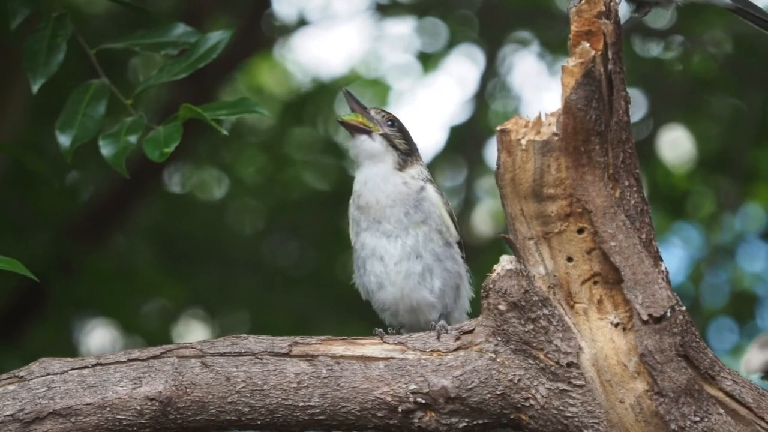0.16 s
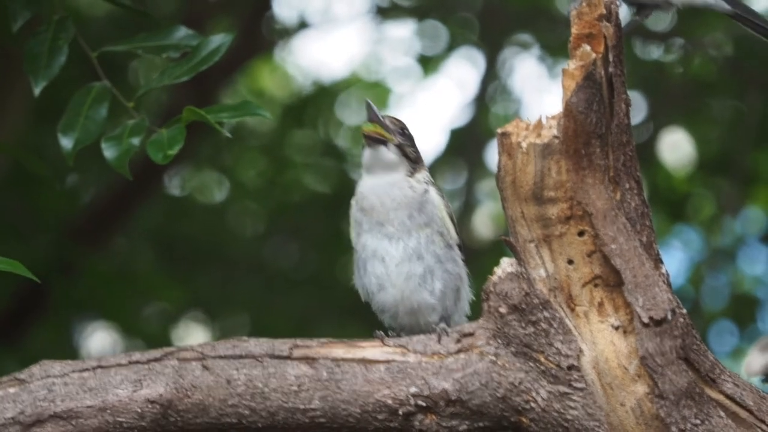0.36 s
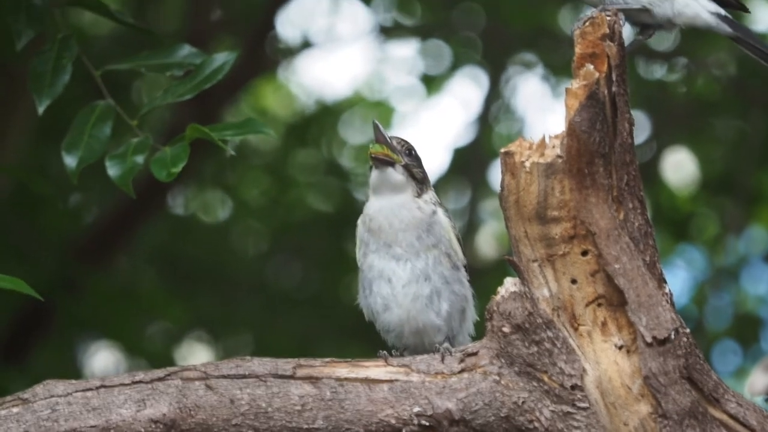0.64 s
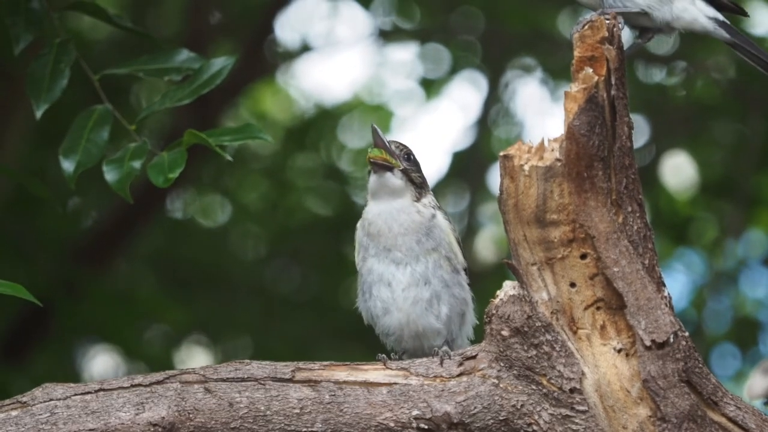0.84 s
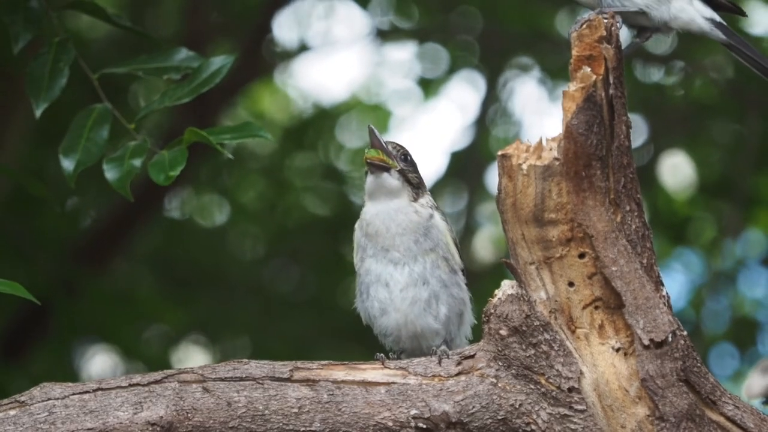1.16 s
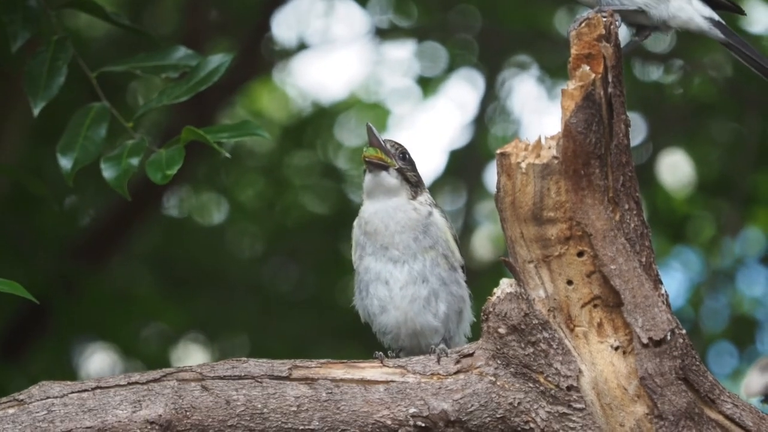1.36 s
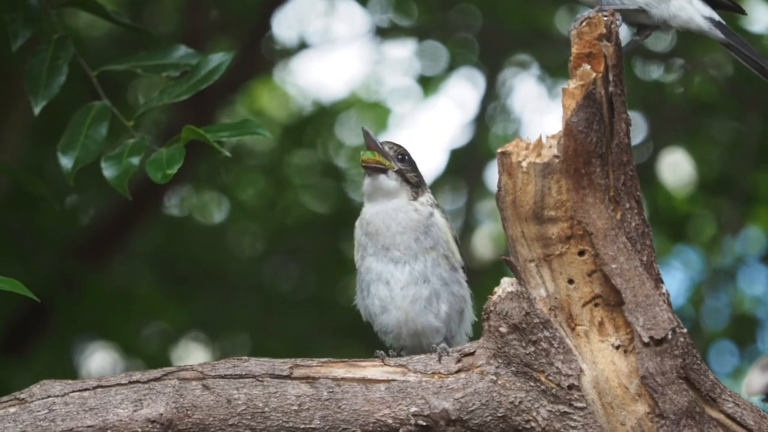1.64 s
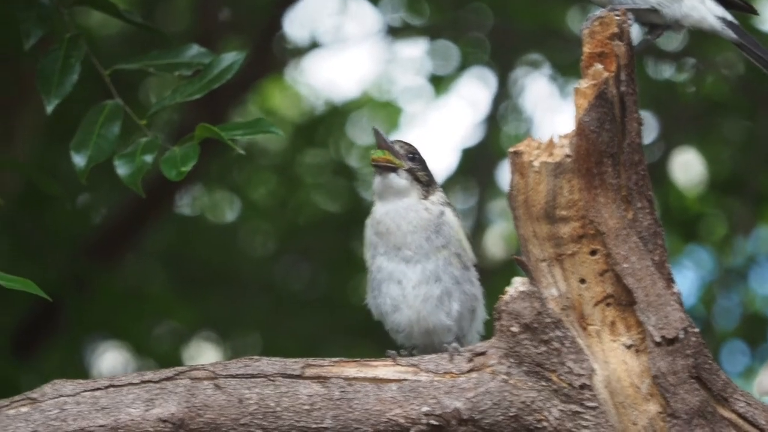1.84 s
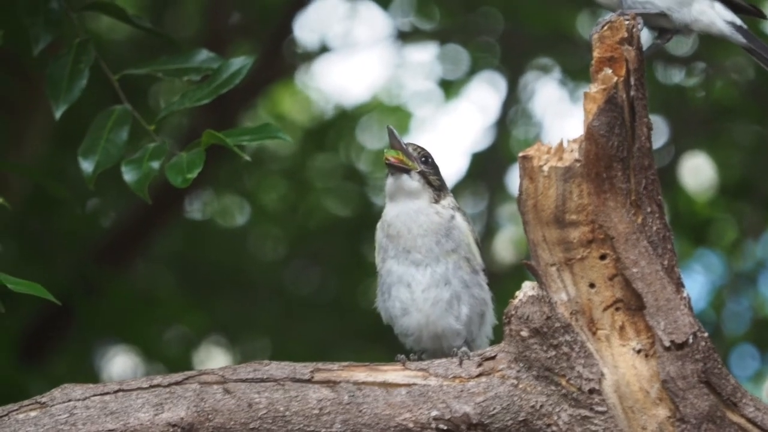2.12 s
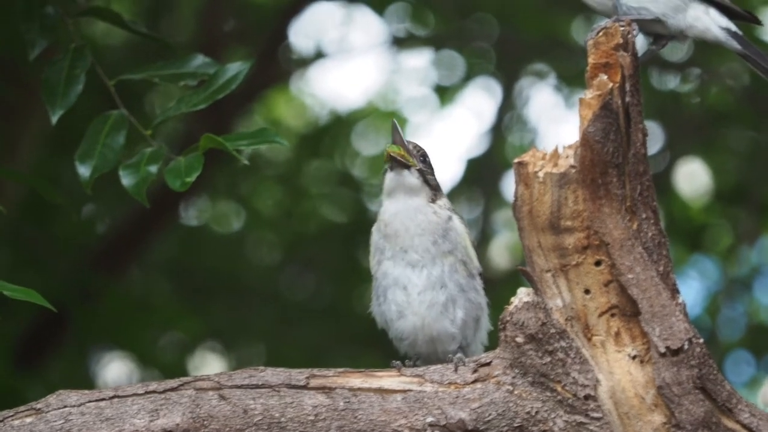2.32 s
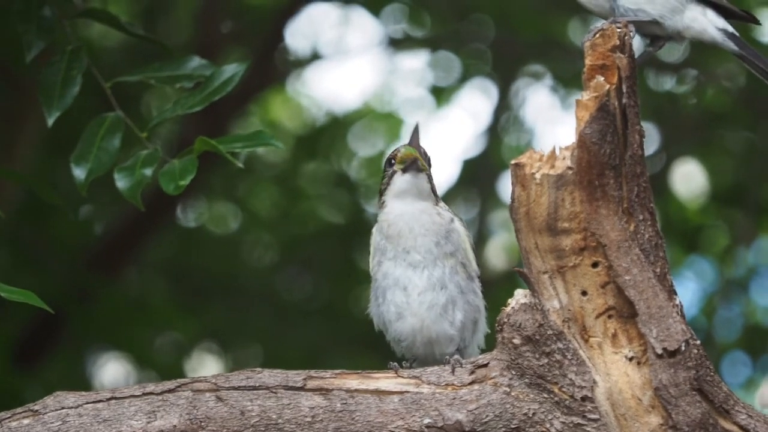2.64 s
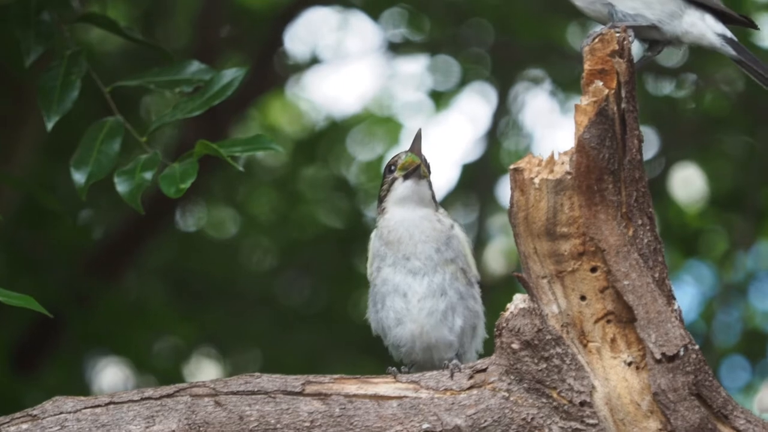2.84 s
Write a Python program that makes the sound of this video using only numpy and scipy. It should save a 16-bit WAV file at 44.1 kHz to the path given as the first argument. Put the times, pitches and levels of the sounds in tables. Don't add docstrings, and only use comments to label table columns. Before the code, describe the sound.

Rising, raspy begging squawks from a young bird close by, with fluttering wings and claw knocks on wood

```python
import sys
import numpy as np
from scipy import signal
from scipy.fft import rfft, irfft
from scipy.io import wavfile

SR = 44100
rng = np.random.default_rng(int(sys.argv[2]) if len(sys.argv) > 2 else 0)


def ratio_of_db(decibels):
    return 10 ** (np.asarray(decibels, float) / 20)


def store_wav(level_fs):
    pcm = np.round(np.clip(np.atleast_2d(level_fs), -1, 1) * 32767)
    wavfile.write(sys.argv[1], SR, pcm.T.astype(np.int16))


N = 131418
TIME = np.arange(N) / SR
SIDES = np.array([[1], [-1]])


def rms_one(x):
    return x / np.sqrt(np.mean(x ** 2) + 1e-20)


def at_hz(points, hz):
    points_hz, values = np.transpose(points)
    return np.interp(np.log(hz), np.log(points_hz), values)


def drift(rate):
    r = np.exp(-40 * np.pi * rate / SR)
    noise = rng.standard_normal(N // 20 + 2002)
    slow = rms_one(signal.lfilter([1], [1, -2 * r, r * r], noise)[2000:])
    return np.interp(np.arange(N) / 20, np.arange(len(slow)), slow)


def resonance(x, hz, width_hz):
    r = np.exp(-np.pi * width_hz / SR)
    poles = [1, -2 * r * np.cos(2 * np.pi * hz / SR), r * r]
    return signal.lfilter(np.array([1, 0, -1]) * (1 - r * r) / 2, poles, x)


def filtered(x, order, hz, kind):
    return signal.sosfilt(signal.butter(order, hz, kind, fs=SR, output="sos"), x)


# (frequency [Hz], left-right likeness [0-1])
FIELD_LIKENESS = [(60, 1), (180, 0.85), (550, 0.68), (1650, 0.57), (4970, 0.15), (15000, 0.45)]
# (frequency [Hz], left minus right [dB])
FIELD_BALANCE = [(60, 2), (240, 1), (950, 0.5), (3770, 1), (15000, 1.5)]


def stereo_noise(spectrum, alike_share):
    hz = np.maximum(np.arange(N // 2 + 1) * SR / N, 1)
    low_cut = np.minimum(hz / spectrum[0][0], 1) ** 2
    mid, side = rfft(rng.standard_normal((2, N)))
    alike = np.clip((at_hz(FIELD_LIKENESS, hz) - .3) / .7, 0, 1) ** .5 * alike_share
    tilt = ratio_of_db(at_hz(FIELD_BALANCE, hz) / 2 * SIDES)
    both = np.sqrt(1 + alike) * mid + np.sqrt(1 - alike) * side * SIDES
    return rms_one(irfft(both * tilt * low_cut * ratio_of_db(at_hz(spectrum, hz)), N))


# (frequency [Hz], density [dB per Hz])
LEAF_TRAFFIC_SPECTRUM = [(100, 3), (620, -2), (820, -8.5), (1200, -6), (3000, -10.5), (4500, -20),
                         (7000, -24), (16000, -34)]


def leaves_and_traffic():
    return ratio_of_db(-58 + 1.03 * drift(18)) * stereo_noise(LEAF_TRAFFIC_SPECTRUM, alike_share=0.87)


# (frequency [Hz], density [dB per Hz])
RUMBLE_SPECTRUM = [(15, 12.5), (25, 9), (45, 2), (70, -7.5), (110, -21.5), (160, -42)]
# (time [s], level [dB])
WIND_LEVEL = [(0, -42), (.55, -45), (.75, -43.5), (1.6, -42), (2.05, -43.5), (2.4, -41), (2.98, -44.5)]


def wind():
    gust = ratio_of_db(np.interp(TIME, *np.transpose(WIND_LEVEL)))
    return gust * ratio_of_db(1.1 * drift(5.3)) * stereo_noise(RUMBLE_SPECTRUM, alike_share=.995)


# (time [s], level [dB])
ENGINE_LEVEL = [(0, -65.5), (0.498, -67), (.7, -74), (2.1, -105), (2.17, -64), (2.4, -58), (2.66, -57.5),
                (2.88, -62), (2.98, -75)]
ENGINE_HZ, ENGINE_WIDTH_HZ = 357.6, 153


def engine():
    noise = rng.standard_normal(N)
    for _ in range(2):
        noise = resonance(noise, ENGINE_HZ, ENGINE_WIDTH_HZ)
    tone_hz = ENGINE_HZ * (1 + .08 * drift(8.4))
    tone = np.sin(2 * np.pi * np.cumsum(tone_hz) / SR)
    level = ratio_of_db(np.interp(TIME, *np.transpose(ENGINE_LEVEL)))
    return level * (rms_one(noise) + ratio_of_db(-6) * tone)


# (frequency [Hz], gain [dB])
THROAT_RESPONSE = [(1250, 1), (2000, -12), (2500, -1), (3150, -9), (3800, -9), (4500, -21), (5400, -11),
                   (7500, -16)]
ATTACK_S, RELEASE_S = 0.012, 0.0067
WOBBLE, DROOP_SHARE, DROOP_S = .006, 0.054, 0.0397
FADE_DB, FADE_RATE_HZ, RASP = 1.6, 40, .25


def voice(calls):
    s, hz, db, open_db = np.transpose([row for call in calls for row in call])
    droop, gate = np.zeros(N), np.zeros(N)
    for call in calls:
        start, end = call[0][0], call[-1][0]
        droop += np.clip((TIME - end) / DROOP_S + .5, 0, 1) * (TIME < end + .05)
        attack = np.clip((TIME - start) / ATTACK_S + .5, 0, 1)
        gate += attack * np.clip((end - TIME) / RELEASE_S + 1, 0, 1)
    pitch = np.interp(TIME, s, hz) * (1 + WOBBLE * drift(73.5) - DROOP_SHARE * droop ** 2)
    phase = 2 * np.pi * np.cumsum(pitch) / SR
    opening = np.interp(TIME, s, open_db)
    out = np.zeros(N)
    for k in range(1, 7):
        gain_db = at_hz(THROAT_RESPONSE, k * pitch) + FADE_DB * np.sqrt(k) * drift(FADE_RATE_HZ)
        if k > 1:
            gain_db = gain_db + opening
        if k > 4:
            gain_db = gain_db - 11
        rasp = 1 + RASP * np.sqrt(k) * drift(100)
        out += ratio_of_db(gain_db) * rasp * np.sin(k * phase)
    return np.sqrt(2) * out * gate * ratio_of_db(np.interp(TIME, s, db))


# (delay [s], left level [dB], right level [dB])
TRUNK_ECHOES = [(.019, -14, -15), (.041, -15, -14), (.075, -15, -16)]
LEAVES_T60_S, LEAVES_DB, LEAVES_APART = .3, -10, .3


def trees(x, pan_db, direct_db):
    out = x * ratio_of_db(direct_db + pan_db / 2 * SIDES)
    for delay, left_db, right_db in TRUNK_ECHOES:
        for side, db in enumerate((left_db, right_db)):
            lag = int(delay * SR * (1 + 0.027 * side))
            out[side, lag:] += ratio_of_db(db) * x[:-lag]
    t = TIME[:SR // 2]
    common, apart = rng.standard_normal((2, len(t)))
    decay = ratio_of_db(-60 * t / LEAVES_T60_S) * np.minimum(t / 0.0032, 1)
    tail = (common + LEAVES_APART * apart * SIDES) * decay
    scatter = signal.fftconvolve(x[None], tail / np.linalg.norm(tail[0]))[:, :N]
    return out + ratio_of_db(LEAVES_DB) * scatter


# (time [s], pitch [Hz], level [dB], beak opening as overtone gain [dB])
FAR_BIRD_CALLS = [
    [(0, 1020, -68, -2), (.05, 980, -67, -2), (.11, 1009, -68, -4)],
    [(.74, 1033, -62.5, 5), (.81, 1146, -57.5, -4), (.88, 1234, -58.5, 3.5), (.96, 1280, -79, -10)],
    [(1.56, 1071, -56, 10.5), (1.6, 1164, -61.5, 1), (1.69, 1231, -70.5, 12.5), (1.78, 1280, -73, -2)],
    [(2.5, 1000, -60, -8), (2.56, 1020, -59, -8), (2.575, 1125, -57, -3), (2.61, 1200, -62, 2),
     (2.65, 1265, -61.5, 5.5), (2.78, 1295, -66.5, -9)],
]


def far_bird():
    return trees(voice(FAR_BIRD_CALLS), pan_db=1.4, direct_db=-3)


# (time of peak [s], level [dB], width [s], body relative to feather hiss [dB])
WING_STROKES = [(0.072, -66, 0.0046, -2), (.1, -64, 0.032, 0), (0.251, -73, 0.086, 3),
                (0.419, -66, 0.0086, 3.9), (.48, -74.5, 0.016, -3), (0.581, -67.5, 0.015, 3),
                (0.744, -68.5, 0.019, 5.5), (0.917, -64.5, 0.0055, 3.5), (1.081, -68, 0.0081, 4.2),
                (1.239, -64.5, 0.012, 3), (1.403, -66, 0.027, -5), (1.552, -62.5, 0.023, 2.5),
                (1.701, -61.5, 0.013, 2), (1.858, -62, 0.017, 4.5), (2.017, -62.5, 0.02, 5),
                (2.191, -62.5, 0.021, 3.5), (2.356, -63.5, 0.025, 4.5), (2.511, -62.5, 0.021, 4.5),
                (2.667, -59.5, 0.017, 4), (2.822, -65.5, 0.01, 5.5), (2.97, -112, 0.017, -7)]
# (frequency [Hz], density [dB per Hz])
FEATHER_SPECTRUM = [(150, -7.5), (300, -9.5), (700, -15), (1220, -11), (2700, -6.5), (4200, -6.5),
                    (8000, -16), (16000, -23)]
STROKE_TAIL, GRAIN_DB, BODY_HZ = 1.63, 2.5, 3843
PUSH_DB, PUSH_HZ, PUSH_WIDTH_S = 11.5, (14.2, 58.3), 0.036


def wings():
    s, db, width, body_db = np.transpose(WING_STROKES)[:, :, None]
    after = (TIME - s) / width
    envelope = np.exp(-np.where(after < 0, after ** 2, np.abs(after) / STROKE_TAIL))
    shape = ratio_of_db(db + 14) * envelope
    noise = stereo_noise(FEATHER_SPECTRUM, alike_share=1) * ratio_of_db(GRAIN_DB * drift(300))
    hiss = shape.sum(axis=0) * filtered(noise, 2, BODY_HZ, "high")
    body = (shape * ratio_of_db(body_db)).sum(axis=0) * filtered(noise, 2, BODY_HZ, "low")
    push = (ratio_of_db(db + PUSH_DB) * np.exp(-((TIME - s) / PUSH_WIDTH_S) ** 2)).sum(axis=0)
    low = rms_one(filtered(rng.standard_normal(N), 3, PUSH_HZ, "band"))
    return hiss + body + push * low * ratio_of_db(.9 * SIDES)


# (time [s], peak level [dB])
FEATHER_SNAPS = [
    (0.0723, -41.5),
    (0.571, -56),
    (1.5356, -43.5),
    (1.697, -56),
    (1.849, -47),
    (1.9836, -47.5),
    (2.1743, -46),
    (2.507, -40),
    (2.6473, -43.5),
]
SNAP_T60_S, SNAP_LOW_HZ = .02, 1500


def snaps():
    s, db = np.transpose(FEATHER_SNAPS)[:, :, None]
    decay_db = -60 * np.maximum(TIME - s, 0) / SNAP_T60_S
    shape = (ratio_of_db(db + 0.5 + decay_db) * (TIME >= s)).sum(axis=0)
    common, apart = rng.standard_normal((2, N))
    return shape * filtered(common + 0.62 * apart * SIDES, 2, SNAP_LOW_HZ, "high") / 2


# (time [s], pitch [Hz], level [dB], beak opening as overtone gain [dB])
NEAR_BIRD_CALLS = [
    [(.135, 975, -62, 0), (.17, 1020, -58, 0), (.195, 1045, -68, 10), (.215, 1090, -52.5, -2),
     (.285, 1212, -54, 4.5), (.345, 1235, -62, -6)],
    [(.665, 1067, -60, -3), (.685, 1120, -54, -3), (.735, 1240, -54.5, 2.5), (.8, 1330, -57, 4),
     (.84, 1345, -58, 6), (.89, 1310, -62, 3)],
    [(1.255, 1065, -56, -3), (1.3, 1185, -53, 1.5), (1.35, 1300, -54.5, 2), (1.4, 1365, -55, 0),
     (1.45, 1392, -52, -4), (1.47, 1395, -58, -3)],
    [(1.8, 1070, -60, -5), (1.825, 1115, -54, -5), (1.87, 1185, -54, -1), (1.92, 1220, -54.5, 3),
     (1.98, 1255, -56, 0), (2.02, 1280, -60, -2)],
    [(2.32, 965, -64, -8), (2.365, 1035, -62, -4), (2.41, 1120, -52.5, -4), (2.455, 1175, -53.5, 1),
     (2.49, 1243, -57, 7), (2.55, 1245, -64, 2)],
    [(2.84, 1085, -57, -3), (2.86, 1140, -54, -3), (2.89, 1230, -55, 2), (2.925, 1300, -54.5, 2),
     (2.955, 1320, -59, 5), (2.98, 1345, -57, 0)],
]


def near_bird():
    return trees(voice(NEAR_BIRD_CALLS), pan_db=-0.12, direct_db=0)


# (time [s], level [dB], pitch [Hz], decay time T60 [s])
CLAW_KNOCKS = [(0.225, -51.5, 182, 0.09), (0.345, -58, 290, .1), (0.35, -60, 155, 0.2),
               (0.455, -53, 270, 0.07), (0.44, -60, 690, 0.14), (0.22, -66, 690, .15),
               (0.572, -60, 600, .03), (1.303, -52, 314, 0.05), (1.535, -53, 984, .035),
               (1.846, -53, 580, .02), (1.846, -54, 230, .04), (2.275, -64, 1007, .05),
               (2.66, -54, 300, .04), (2.66, -60, 720, .04)]
# (time [s], level [dB], pitch [Hz], decay time T60 [s])
HARD_KNOCK_MODES = [
    (1.9835, -48, 90, .08),
    (1.9835, -46, 170, .06),
    (1.9835, -46, 320, .05),
    (1.9835, -53, 950, .025),
    (1.9835, -53, 2200, .015),
]


def knocks():
    out = np.zeros(N)
    for s, db, hz, t60 in CLAW_KNOCKS + HARD_KNOCK_MODES:
        t = np.maximum(TIME - s, 0)
        out += ratio_of_db(db + 8 - 60 * t / t60) * np.sin(2 * np.pi * hz * t)
    return out


LEFT_LAG_SAMPLES, BIRD_LAG_S = 2, 1.2e-5


def scene():
    birds = far_bird() + near_bird()
    birds[0] = np.interp(TIME - BIRD_LAG_S, TIME, birds[0])
    background = leaves_and_traffic() + wind() + engine()
    left, right = background + birds + wings() + snaps() + knocks()
    return np.array([np.roll(left, LEFT_LAG_SAMPLES), right])


# (frequency [Hz], width [Hz], depth [0-1])
HOUSING_DIPS = [(1844, 940, 0.68), (11340, 550, 0.58)]


def microphone_housing(x):
    for hz, width_hz, depth in HOUSING_DIPS:
        x = x - depth * resonance(x, hz, width_hz)
    return x


def top_cut(x):
    return signal.sosfilt(signal.butter(12, 15710, fs=SR, output="sos"), x)


def record(dry):
    low_pass = signal.cheby2(12, 70, 16900, fs=SR, output="sos")
    mix = signal.sosfilt(low_pass, microphone_housing(dry))
    return top_cut(mix)


dry = scene()
out = record(dry)
store_wav(out)
```